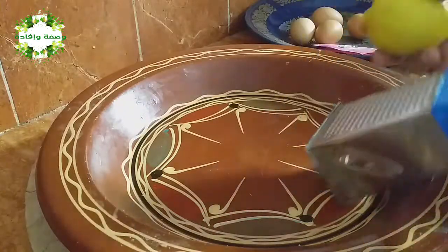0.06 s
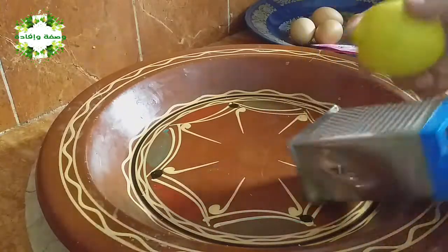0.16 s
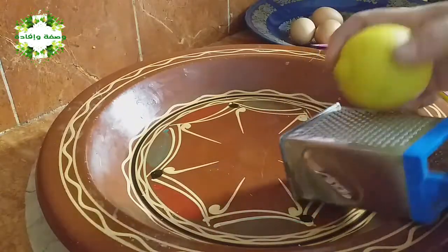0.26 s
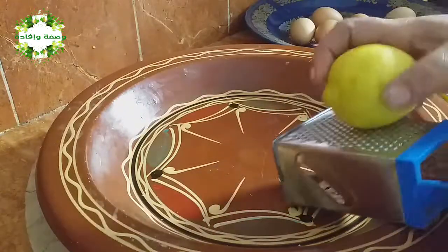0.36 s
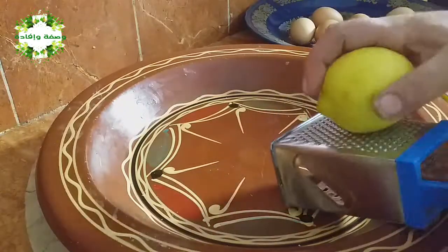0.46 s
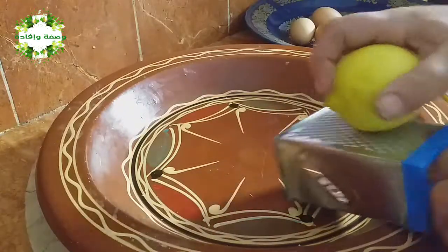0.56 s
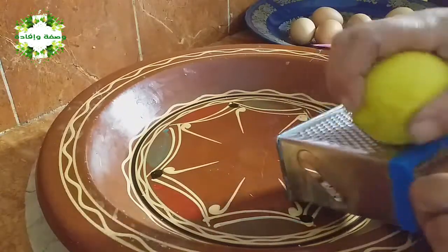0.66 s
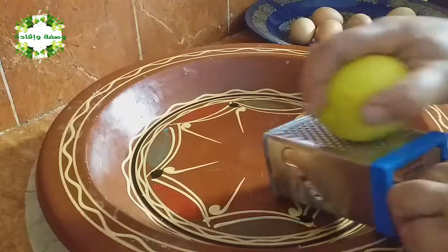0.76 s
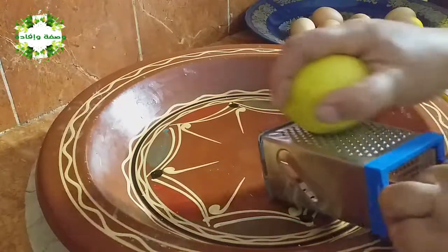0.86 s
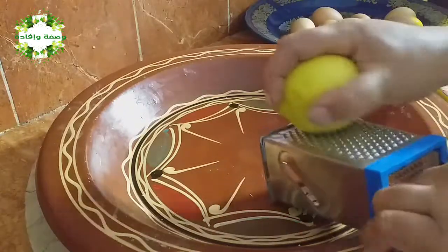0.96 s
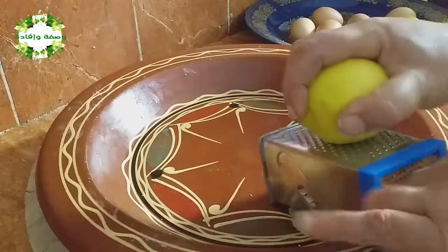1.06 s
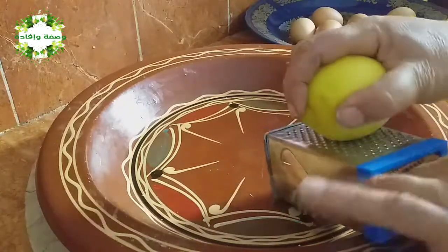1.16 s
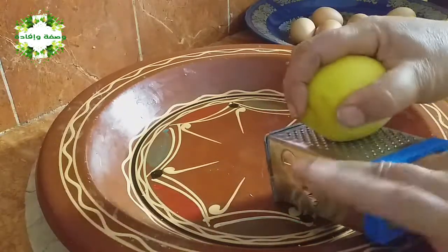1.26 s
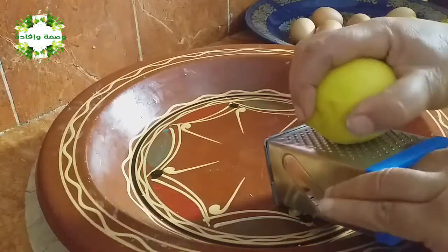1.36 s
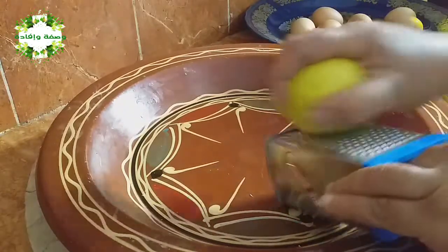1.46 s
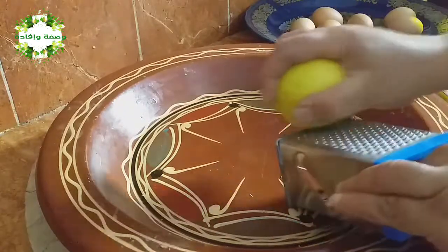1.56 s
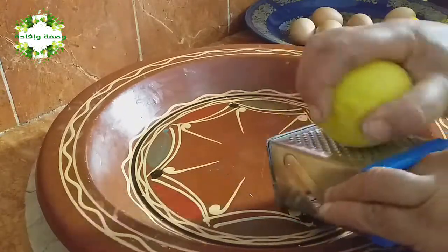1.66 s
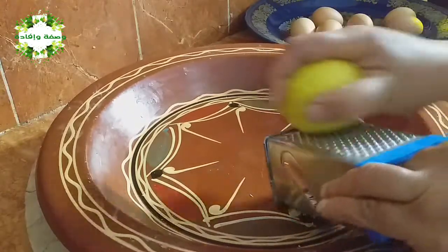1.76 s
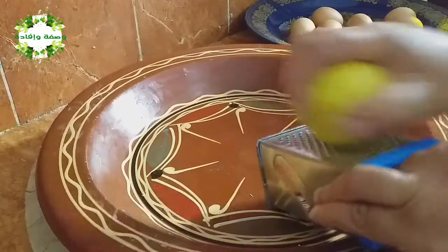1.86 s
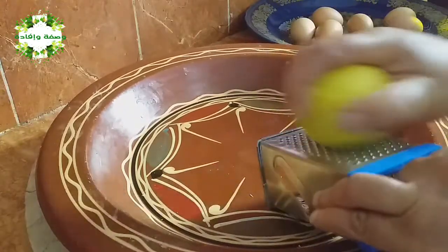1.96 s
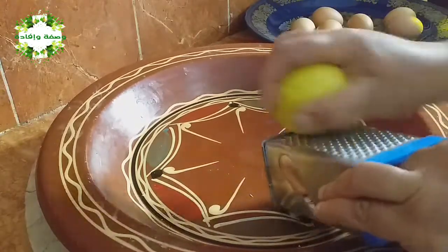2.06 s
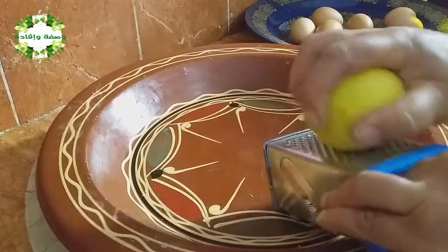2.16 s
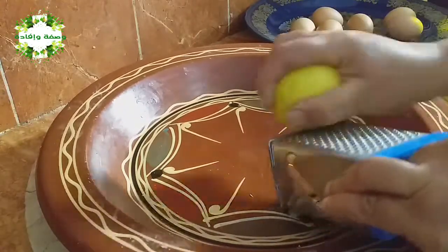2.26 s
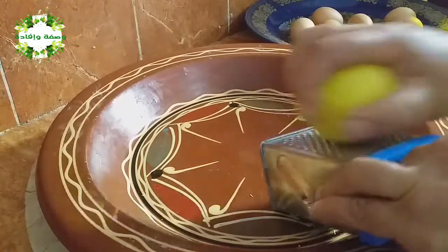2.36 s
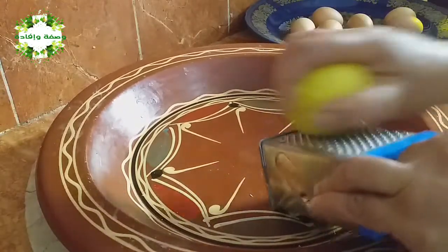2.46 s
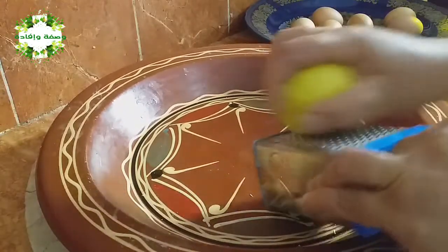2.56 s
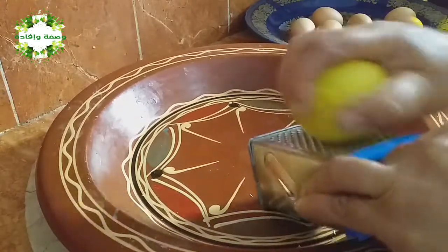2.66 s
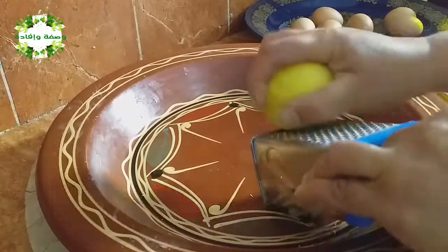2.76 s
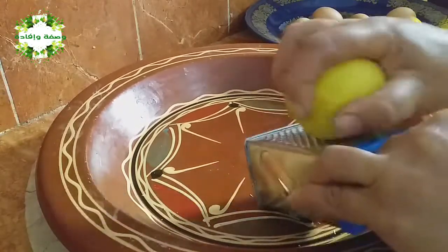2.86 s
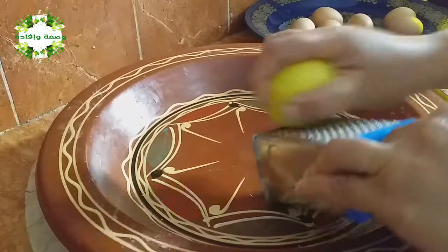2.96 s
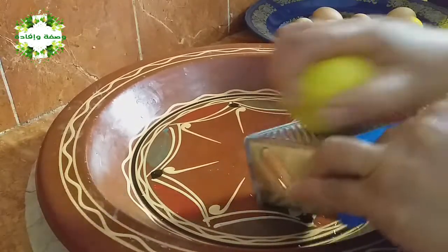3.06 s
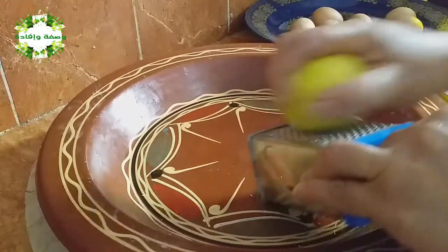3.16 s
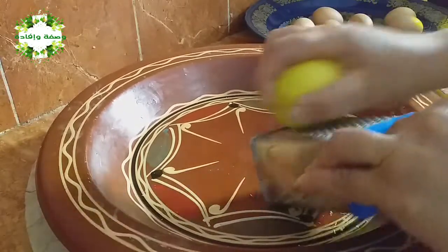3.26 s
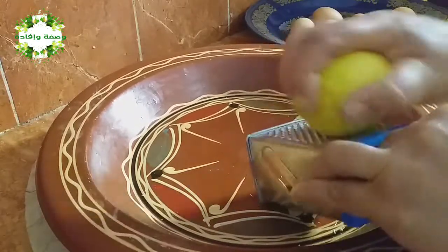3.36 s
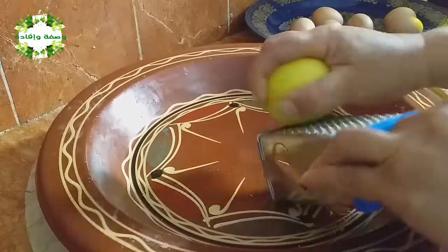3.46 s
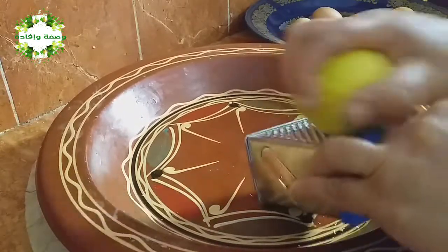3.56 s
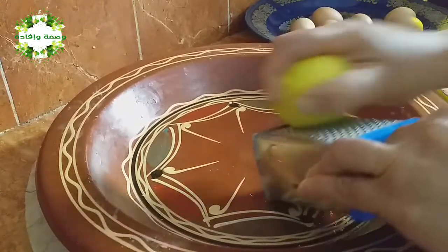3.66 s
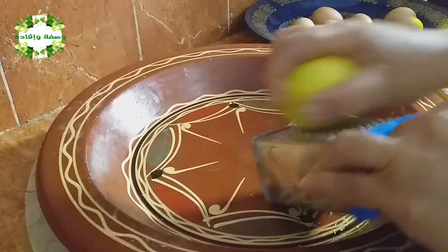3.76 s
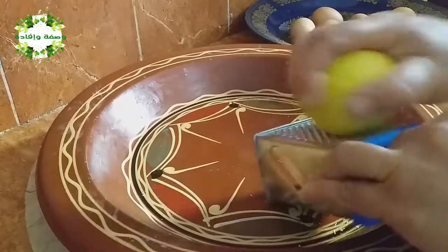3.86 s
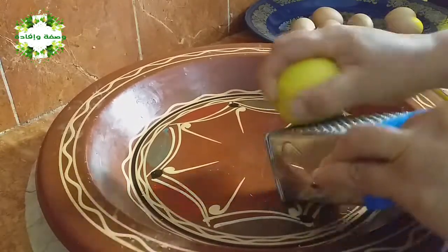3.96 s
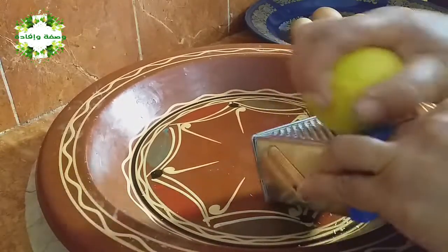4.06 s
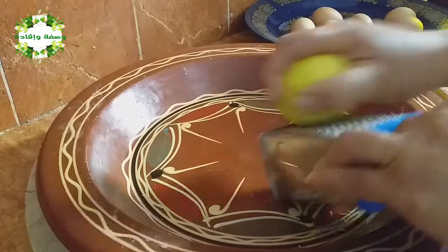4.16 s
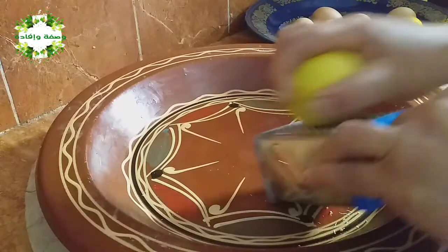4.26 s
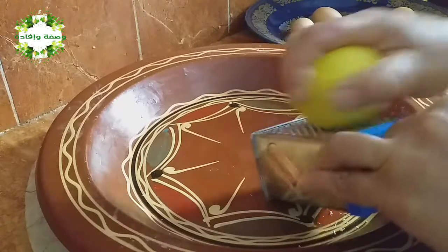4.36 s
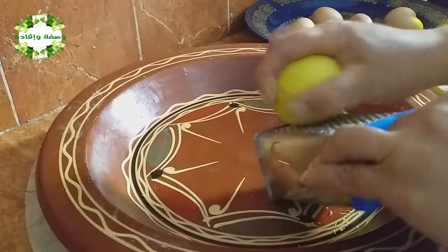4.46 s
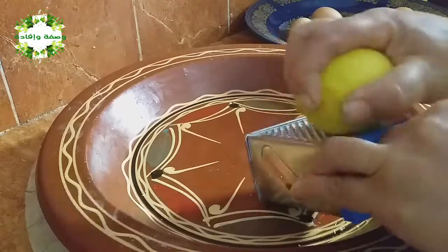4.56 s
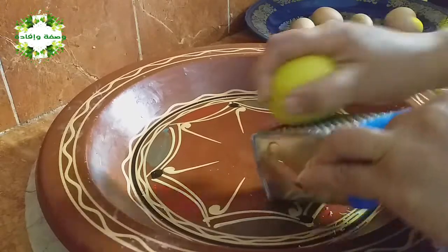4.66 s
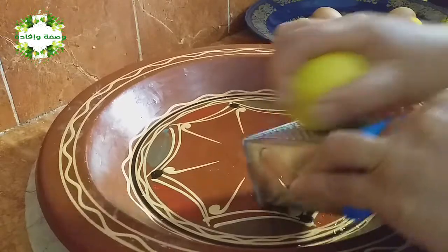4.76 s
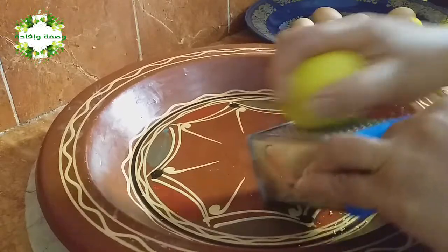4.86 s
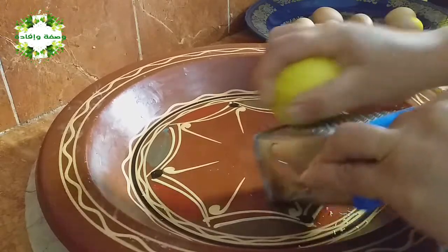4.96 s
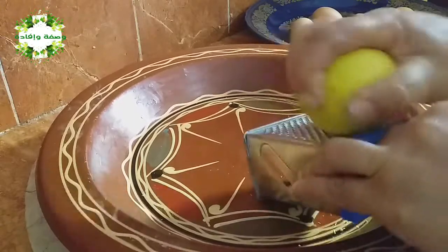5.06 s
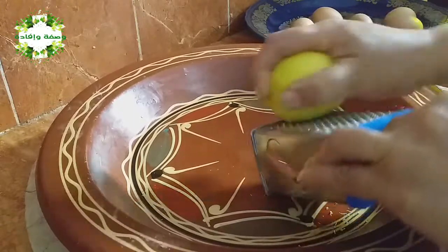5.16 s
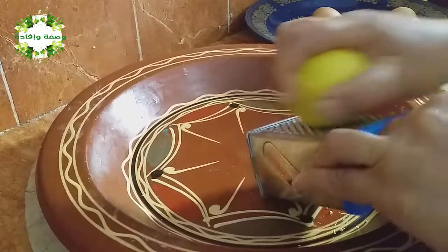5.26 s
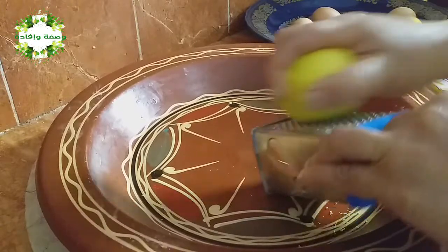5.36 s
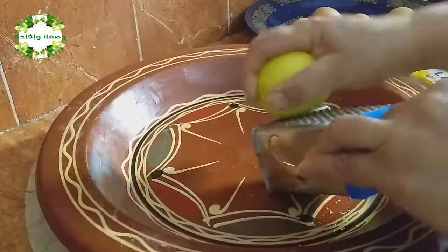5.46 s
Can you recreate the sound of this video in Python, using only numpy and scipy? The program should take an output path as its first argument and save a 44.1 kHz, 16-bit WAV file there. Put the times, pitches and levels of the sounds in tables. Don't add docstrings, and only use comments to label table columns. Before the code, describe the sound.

Close and dry in a home kitchen: light finger brushes, a clack and scrape of hollow sheet metal, two swelling test rasps, faint touches. Then continuous brisk grating, about eight strokes a second, gritty and hissing, with soft low bumps against the clay bowl, stopping at the end. Mono phone sound, short room tail, a barely audible appliance whine under the louder scraping.

```python
import sys
import numpy as np
from scipy import signal
from scipy.fft import rfft, irfft, next_fast_len
from scipy.io import wavfile
from scipy.ndimage import uniform_filter1d

SR = 44100
rng = np.random.default_rng(int(sys.argv[2]) if len(sys.argv) > 2 else 0)


def gain_from_db(level_db):
    decades = np.asarray(level_db, float) / 20
    return 10 ** decades


def unload_audio(sound):
    columns = np.transpose(np.atleast_2d(sound))
    steps = np.round(np.clip(columns, -1, 1) * 32767)
    wavfile.write(sys.argv[1], SR, steps.astype(np.int16))


N = 243343
CONTROL = 8

# pitch_hz, level_db (per Hz)
TEETH_SPECTRUM = [(180, -66), (300, -32.5), (659, -0.5), (790, -8), (1150, -4.5), (2020, -5), (4510, -3),
                  (5970, -5.5), (7690, -2), (8600, -11.5), (11200, -51), (18900, -120)]
# pitch_hz, level_db (per Hz)
FINE_SPECTRUM = [(5060, 4), (8600, -10), (9260, -5.5), (10300, 0), (12700, 2), (15100, 1), (15800, 1.5)]
# pitch_hz, level_db (per Hz)
PUSH_SPECTRUM = [(30, -40), (60, -14.5), (123, -11.5), (145, -14), (188, 2), (215, -11.5), (280, -3.5),
                 (333, -5), (370, -0.5), (450, -6), (600, 2)]
FACE_PITCHES = [2250, 2446, 2600, 2730, 2880, 3400, 3660, 3930, 4426, 4650, 4920, 5550, 6500, 7590]
# width_hz, level_db
FACE_MODES = [(50, -2.5), (40, -0.5), (38, -10), (44, 0), (40.7, 0.5), (72, -2), (60.5, -1.5), (53, -0.5),
              (110, 4), (120, -0.5), (120, 0.5), (91, -0.5), (170, -11), (400, 5)]
BOX_PITCHES = [460, 537, 662, 790, 910, 990, 1168, 1230, 1322, 1490, 1560, 1663]
# width_hz, level_db
BOX_MODES = [(19, -4), (27, 4), (25, -1.5), (36, -3.5), (31, -0.5), (37.4, -1), (47.6, 2.5), (75, -11.5),
             (46.3, 0), (71, -35), (39, 1), (42, -1)]
# time_s, fine_hiss_db, favoured_box_pitch_hz
WEAR = [
    (1.42, 1, 1100),
    (1.63, 2, 780),
    (1.8, 1, 1150),
    (2.1, 1.5, 850),
    (2.5, 1, 1030),
    (3.05, 0.5, 1250),
    (4.2, 0, 1090),
    (4.95, 0, 1150),
    (5.3, 0.5, 885),
]
# time_s, favoured_face_pitch_hz
TOUCHED = [
    (0.0, 4800),
    (0.22, 4340),
    (0.4, 4700),
    (0.5, 6000),
    (0.72, 4180),
    (0.81, 5740),
    (1.17, 5600),
    (1.25, 4100),
    (1.33, 4960),
]


def grater():
    handled, nudge, tried_hz, weight, idle = handling_forces()
    stroked, push = stroke_forces()
    teeth, fine, box = stroked + handled
    worn_db, rubbed_hz = in_time(WEAR)
    touched_hz = in_time(TOUCHED)[0]
    favoured_hz = np.where(idle, tried_hz, rubbed_hz)
    catch = gain_from_db(0.5 * drift(59.0) + 1.01 * drift(11.7))

    tears = patchy(coloured(grains(spread_db=3.5), TEETH_SPECTRUM), depth_db=2.0, bins=4, frames=16)
    direct = teeth * catch * tears * gain_from_db(-1.5)
    sizzle = patchy(coloured(grains(spread_db=1.0), FINE_SPECTRUM), depth_db=1.0, bins=6, frames=12)
    hiss = fine * catch * gain_from_db(worn_db * ~idle + drift(17.0)) * sizzle
    face = resonate(teeth * catch, FACE_PITCHES, FACE_MODES, wander_db=2.5, favoured_hz=touched_hz,
                    fall_db=10.0 * idle) * gain_from_db(-6.5 + 0.6 * idle)
    hollow = resonate(box * catch, BOX_PITCHES, BOX_MODES, wander_db=3.0, favoured_hz=favoured_hz, fall_db=8.5)
    low = (push + nudge) * coloured(rng.standard_normal(N), PUSH_SPECTRUM)

    tearing = direct + face
    body = signal.sosfiltfilt(signal.butter(3, 3100, fs=SR, output="sos"), tearing)
    thinned = tearing + (weight - 1) * body
    return thinned + hiss + hollow + low


USUAL_DB = -24.5
FINE_FOLLOWS = 0.58
TEETH_FADE_DB_PER_S, PUSH_FADE_DB_PER_S = 535, 132
# moment of top speed (0-1), fine_hiss_db
AWAY_WAY, BACK_WAY = (0.46, -28.5), (0.5, -30)
# start_s, length_s, teeth_db, box_ring_db (re teeth), bowl_push_db
AWAY = [(1.433, 0.08, -27, -1.5, -64), (1.707, 0.085, -26.5, -6.5, -49.5), (1.947, 0.092, -25, -2, -38.5),
        (2.196, .068, -24, -1.5, -41), (2.435, 0.084, -25, -8, -34), (2.679, 0.069, -24.5, -2, -57),
        (2.916, 0.067, -24, -1.5, -40.5), (3.15, 0.061, -22, -2.5, -38), (3.389, 0.065, -22.5, -1, -45),
        (3.625, .073, -23, -0.5, -36), (3.876, 0.062, -23, -2.5, -39), (4.12, 0.074, -23.5, -3.5, -37.5),
        (4.367, 0.07, -26, -4.5, -42.5), (4.605, 0.077, -25.5, -3, -40.5), (4.846, 0.075, -26.5, 0.5, -51),
        (5.098, 0.071, -23, -4, -46), (5.348, 0.069, -28.5, -2.5, -55)]
# start_s, length_s, teeth_db, box_ring_db (re teeth), bowl_push_db
BACK = [(1.578, 0.091, -28.5, -1, -57), (1.829, .083, -27, -4, -70), (2.085, 0.064, -26.5, -2.5, -45),
        (2.312, 0.084, -23.5, -5, -45), (2.559, 0.074, -24, -2, -42.5), (2.795, 0.073, -25, -6, -63),
        (3.027, 0.075, -22, -4.5, -54), (3.264, 0.077, -23, -5.5, -54), (3.508, 0.069, -22.5, -1, -53),
        (3.751, 0.068, -23.5, -6.5, -49), (3.993, .077, -24.5, -3, -47.5), (4.242, 0.075, -25, -5.5, -42.5),
        (4.482, .07, -26, 0, -51.5), (4.728, 0.071, -25, -5, -47.5), (4.965, 0.079, -25, -3.5, -46.5),
        (5.225, .061, -24.5, -4.5, -50.5)]


def stroke_forces():
    t = np.arange(0, N, CONTROL) / SR
    teeth, fine, box, push = forces = np.zeros((4, len(t)))
    for strokes, (top, fine_db) in ((AWAY, AWAY_WAY), (BACK, BACK_WAY)):
        for start, length, teeth_db, box_db, push_db in strokes:
            speed = swell(t, start - 0.17 * length, 1.502 * length, top - 0.07)
            load = swell(t, start - 0.14 * length, 1.434 * length, 0.44)
            hiss_db = fine_db + FINE_FOLLOWS * (teeth_db - USUAL_DB) + 3.0
            teeth += gain_from_db(teeth_db + 2.5) * speed ** 1.68
            fine += gain_from_db(hiss_db) * np.tanh(1.09 * speed ** 1.67)
            box += gain_from_db(teeth_db + box_db + 2.0) * load ** 1.87
            push += gain_from_db(push_db) * load ** 0.87
    return held(forces[:3], TEETH_FADE_DB_PER_S), held(push, PUSH_FADE_DB_PER_S)


WEIGHT_FOLLOWS_BOX = 0.38
# moment of top force (0-1), peakedness, fine_hiss_db (re teeth),
# weight_db below 3 kHz (re teeth), push_db (re box)
DRAG_WAY, RUB_WAY, BRUSH_WAY = (0.27, 1.26, -13, -8, -24), (0.5557, 1.6, -3.5, -12.5, -18), (0.5, 1.9, -10.5, -19, -6)
# start_s, length_s, teeth_db, box_ring_db (re teeth), favoured_box_pitch_hz
DRAGS = [
    (0.106, 0.11, -36.5, -2, 1310),
    (0.17, 0.14, -50, 5.5, 1000),
    (0.26, 0.12, -38, -0.5, 810),
    (0.668, 0.17, -32, -6.5, 1180),
    (0.96, 0.05, -36, 0, 750),
]
# start_s, length_s, teeth_db, box_ring_db (re teeth), favoured_box_pitch_hz
RUBS = [
    (0.515, 0.16, -34, -5, 910),
    (0.725, 0.23, -27, -8.5, 1050),
    (0.96, 0.12, -29, -7, 716),
    (1.03, 0.098, -43.5, -5.5, 800),
    (1.06, 0.37, -64.5, 4.5, 547),
    (5.44, 0.11, -52.5, 9, 770),
]
# start_s, length_s, teeth_db, box_ring_db (re teeth), favoured_box_pitch_hz
BRUSHES = [
    (-0.04, 0.11, -53.5, -12, 1400),
    (0.02, 0.082, -60, -17, 1300),
    (0.065, 0.059, -41.5, -18, 1400),
    (0.43, 0.15, -51.5, -17, 1600),
    (1.12, 0.069, -55, -6, 880),
    (1.19, 0.11, -57, -7, 560),
    (1.255, 0.087, -38, -22, 910),
    (1.385, 0.045, -47.5, -4, 1500),
]
# time_s, peak_db, box_ring_db (re peak), fine_hiss_db (re peak), rattle_s
KNOCKS = [(0.0942, -29, -18, -21, 0.017), (0.109, -11, -5, -3, 0.02), (0.2618, -49, -2, -5, 0.017),
          (0.273, -29, -9, 9, 0.013), (0.3355, -19, -22, -8, 0.028), (0.672, -3.5, -22, -13, 0.014),
          (0.726, -3, -8, -11, 0.017), (0.9647, -14.5, 1, -11, 0.015), (1.158, -28, 5.5, -10, 0.0048),
          (1.2974, -32, -14, -16, 0.012), (1.5354, -13, 8, -12, 0.017), (3.895, -9, -22, -18, 0.0059),
          (5.3183, -14, -9, -14, 0.022)]


def handling_forces():
    t = np.arange(0, N, CONTROL) / SR
    sums = np.zeros((6, len(t)))
    for touches, way in ((DRAGS, DRAG_WAY), (RUBS, RUB_WAY), (BRUSHES, BRUSH_WAY)):
        top, peaked, fine_db, weight_db, push_db = way
        for start, length, teeth_db, box_db, hz in touches:
            force = gain_from_db(teeth_db) * swell(t, start, length, top) ** peaked + 1e-7
            lower_db = weight_db + 8.5 + WEIGHT_FOLLOWS_BOX * box_db
            pitched_db = box_db + 20 * np.log10(hz)
            shares_db = np.array([0, fine_db, box_db, box_db + push_db, lower_db, pitched_db])
            sums += force * gain_from_db(shares_db)[:, None]
    sums = np.repeat(sums, CONTROL, axis=1)[:, :N]
    t = np.arange(N) / SR
    idle = (t < AWAY[0][0] - 0.013) | (t > AWAY[-1][0] + 0.08)
    weight = np.where(idle, sums[4] / sums[0], 1)
    pitch_hz = sums[5] / sums[2]
    forces = sums[:3]

    since = t[:SR // 10]
    for start, peak_db, box_db, fine_db, rattle in KNOCKS:
        crack = 1.1 * np.exp(-since / 0.00085)
        dying = np.exp(-(since / max(rattle, 0.001)) ** 1.8) + crack
        at = round(start * SR)
        levels_db = peak_db - 21.5 + np.array([[0], [fine_db], [box_db]])
        forces[:, at:at + len(since)] += gain_from_db(levels_db) * dying
    return forces, sums[3], pitch_hz, weight, idle


def grains(spread_db):
    size_db = spread_db * np.minimum(rng.exponential(1, N), 3)
    return rms_one(rng.standard_normal(N) * gain_from_db(size_db))


def patchy(x, depth_db, bins, frames):
    cells = signal.stft(x, nperseg=256, noverlap=192)[2]
    field = rng.standard_normal(cells.shape)
    for _ in range(2):
        field = uniform_filter1d(field, size=bins, axis=0)
        field = uniform_filter1d(field, size=frames, axis=1)
    swelling = cells * gain_from_db(depth_db * rms_one(field))
    return rms_one(signal.istft(swelling, nperseg=256, noverlap=192)[1][:N])


def resonate(force, pitches, modes, wander_db, favoured_hz, fall_db):
    out, power = np.zeros(N), 0
    for hz, (width_hz, level_db) in zip(pitches, modes):
        r = np.exp(-np.pi * width_hz / SR)
        poles = [1, -2 * r * np.cos(2 * np.pi * hz / SR), r * r]
        octaves_off = np.abs(np.log2(hz / favoured_hz))
        share_db = level_db + wander_db * drift(6.0) - fall_db * octaves_off
        drive = force * rng.standard_normal(N) * gain_from_db(share_db) + 1e-18
        out += signal.lfilter([1, 0, -1], poles, drive) * np.sqrt((1 - r * r) / 2)
        power += gain_from_db(2 * level_db)
    return out / np.sqrt(power)


def swell(t, start, length, top):
    lean = np.log(0.5) / np.log(np.clip(top, 0.05, 0.9))
    progress = np.clip((t - start) / length, 0, 1)
    return np.sin(np.pi * progress ** lean).clip(0)


def held(force, fade_db_per_s):
    fade_db = fade_db_per_s * np.arange(0, N, CONTROL) / SR
    force_db = 20 * np.log10(force + 1e-9)
    kept = gain_from_db(np.maximum.accumulate(force_db + fade_db, axis=-1) - fade_db)
    return np.repeat(kept, CONTROL, axis=-1)[..., :N]


def in_time(table):
    s, *columns = np.transpose(table)
    return [np.interp(np.arange(N) / SR, s, column) for column in columns]


def rms_one(x):
    return x / np.sqrt(np.mean(x ** 2) + 1e-20)


def coloured(x, spectrum):
    size = next_fast_len(N)
    hz, level_db = np.transpose(spectrum)
    bins_hz = np.arange(1, size // 2 + 2) * SR / size
    shape_db = np.interp(np.log(bins_hz), np.log(hz), level_db, left=-120, right=-120)
    return rms_one(irfft(rfft(x, size) * gain_from_db(shape_db), size)[:N])


def drift(rate_hz):
    step = 40
    r = np.exp(-2 * step * np.pi * rate_hz / SR)
    slow = signal.lfilter([1], [1, -2 * r, r * r], rng.standard_normal(N // step + 1002))[1000:]
    return np.interp(np.arange(N) / step, np.arange(len(slow)), rms_one(slow))


# time_s, peak_db, pitch_hz, ring_s
BUMPS = [
    (1.443, -48, 510, 0.012),
    (1.596, -34, 490, 0.0093),
    (1.941, -24, 510, 0.0055),
    (1.95, -22.5, 353, 0.0063),
    (2.314, -35, 477, 0.012),
    (2.455, -26, 318, 0.015),
    (3.171, -26, 494, 0.02),
    (3.388, -39, 500, 0.013),
    (3.878, -53, 410, 0.012),
    (4.89, -30, 475, 0.014),
]
# time_s, peak_db, pitch_hz, ring_s
PANELS = [
    (0.110, -33, 1312, 0.036),
    (0.264, -35, 640, 0.023),
    (0.728, -26.5, 1263, 0.013),
    (0.728, -22, 1940, 0.0061),
    (0.728, -16, 3225, 0.0044),
    (0.728, -21, 5250, .006),
    (0.966, -26.5, 686, 0.0095),
    (0.966, -28, 1013, 0.015),
    (1.536, -24.5, 1150, 0.0096),
    (1.536, -30.5, 645, 0.012),
]


def bumps():
    since, out = np.arange(SR // 5) / SR, np.zeros(N)
    for start, peak_db, hz, ring in [*BUMPS, *PANELS]:
        at = round(start * SR)
        envelope = np.exp(-since / ring) - np.exp(-since * hz / 0.45)
        out[at:at + len(since)] += gain_from_db(peak_db + 2.5) * envelope * np.sin(2 * np.pi * hz * since)
    return out


def kitchen(x):
    t60_s, level_db = 0.38, -12
    t = np.arange(int(0.5 * SR)) / SR
    tail = rng.standard_normal(len(t)) * gain_from_db(-60 * t / t60_s) * (t > 0.003)
    tail = signal.lfilter([1], [1, -0.4], tail)
    return gain_from_db(level_db) * signal.fftconvolve(x, tail / np.sqrt(np.sum(tail ** 2)))[:N]


WHINE_HZ, WHINE_OPEN_DB, WHINE_SHUT_DB, WHINE_KNEE_DB = 1576, -56, -75, -45
HUM_KNEE_DB = -37
# pitch_hz, level_db (re whine)
HUM = [
    (49.5, -13.5),
    (99.3, -15),
]


def appliance(near):
    t = np.arange(N) / SR
    power = uniform_filter1d(near ** 2, size=1500)
    through = gain_from_db(WHINE_SHUT_DB) + gain_from_db(WHINE_OPEN_DB) * power / (power + gain_from_db(2 * WHINE_KNEE_DB))
    whine = np.sin(2 * np.pi * WHINE_HZ * t)
    hum = sum(gain_from_db(level_db + 2.0 * drift(6.4)) * np.sin(2 * np.pi * hz * t) for hz, level_db in HUM)
    return through * (whine + hum * power / (power + gain_from_db(2 * HUM_KNEE_DB)))


# pitch_hz, level_db (per Hz)
AIR_SPECTRUM = [(150, 1), (500, -11), (1100, -18), (1400, -30), (2300, -25), (3100, -13), (4000, -18),
                (5200, 3.5), (8000, -6), (9000, -3), (15500, -15)]


def room_air():
    return gain_from_db(-62.5 + 2.0 * drift(4.0)) * coloured(rng.standard_normal(N), AIR_SPECTRUM)


def scene():
    near = grater() + bumps()
    mono = near + kitchen(near) + room_air() + appliance(near)
    return np.array([mono, mono])


# pitch_hz, level_db (per cell)
LEARNT = [(60, -84.5), (250, -73.5), (400, -89), (1150, -73.5), (1330, -75), (1500, -65), (1576, -100),
          (1660, -86), (2500, -65.5), (2900, -97), (3800, -73.5), (4500, -80.5), (8200, -83), (9000, -87),
          (15000, -86.5)]


def suppress(x, depth_db=-18):
    hz, _, cells = signal.stft(x, SR, nperseg=1024, noverlap=768)
    power = uniform_filter1d(np.abs(cells) ** 2, size=3, axis=0)
    power = uniform_filter1d(power, size=5, axis=1)
    noise_hz, noise_db = np.transpose(LEARNT)
    learnt_db = np.interp(np.log(hz + 1), np.log(noise_hz), noise_db)
    gain = np.clip(1 - gain_from_db(2 * learnt_db)[:, None] / (power + 1e-16), gain_from_db(depth_db), 1)
    return signal.istft(cells * gain, nperseg=1024, noverlap=768)[1][:N]


def top_cut(x):
    return signal.sosfilt(signal.butter(12, 16640, fs=SR, output="sos"), x)


def record(dry):
    edge = signal.ellip(12, 0.5, 70, 15640, fs=SR, output="sos")
    mono = signal.sosfilt(edge, suppress(dry[0]))
    return top_cut(np.array([mono, mono]))


dry = scene()
out = record(dry)
unload_audio(out)
```